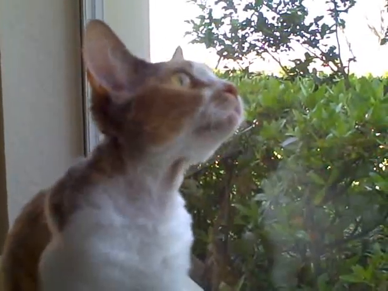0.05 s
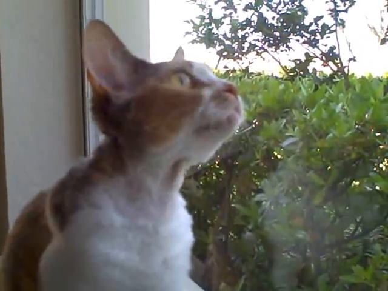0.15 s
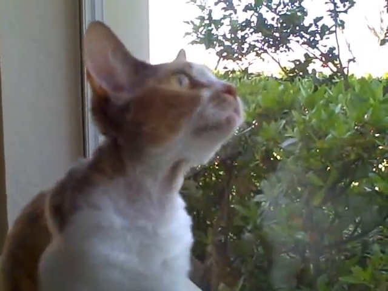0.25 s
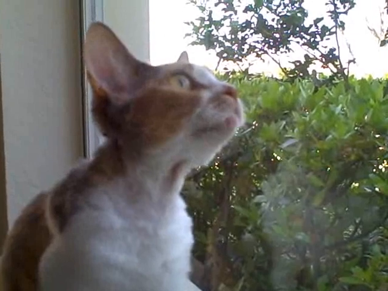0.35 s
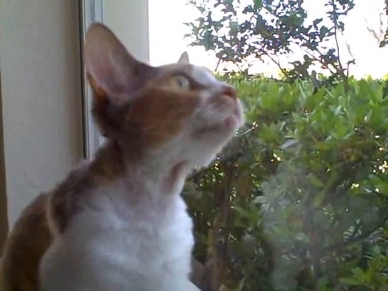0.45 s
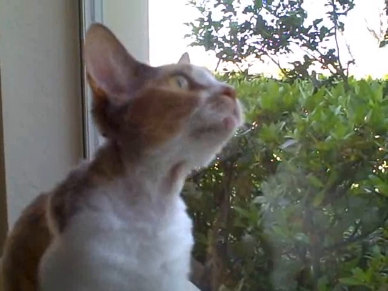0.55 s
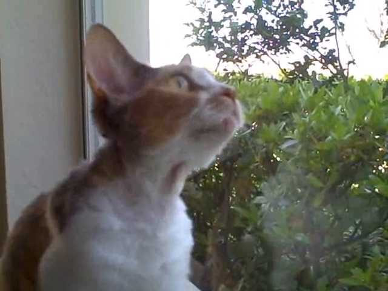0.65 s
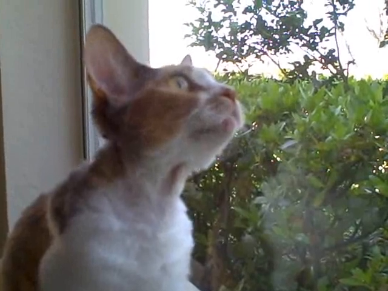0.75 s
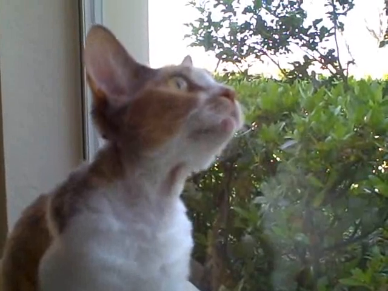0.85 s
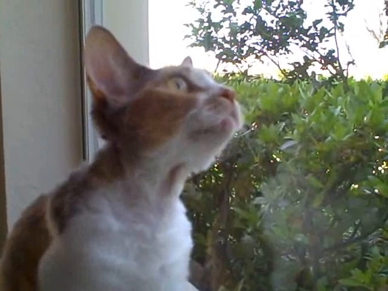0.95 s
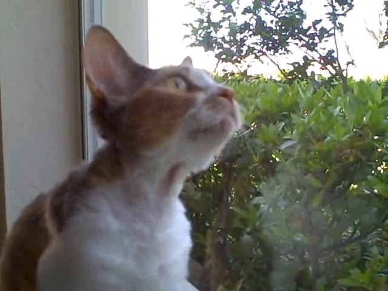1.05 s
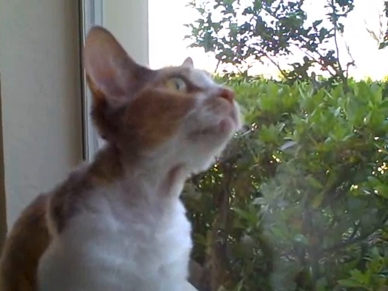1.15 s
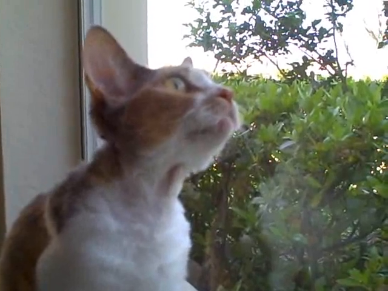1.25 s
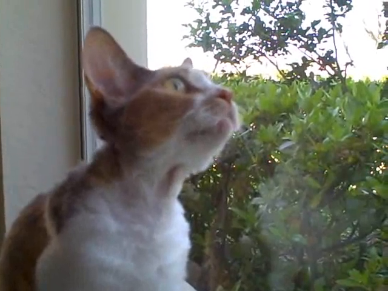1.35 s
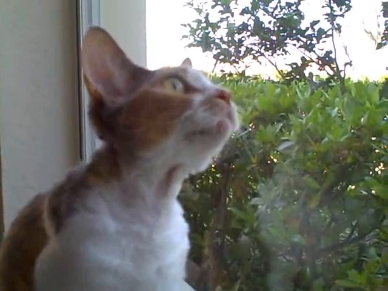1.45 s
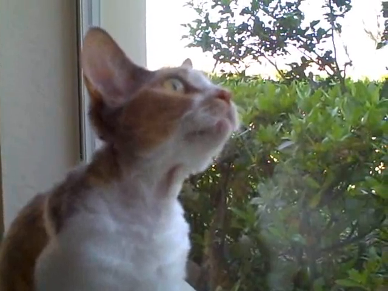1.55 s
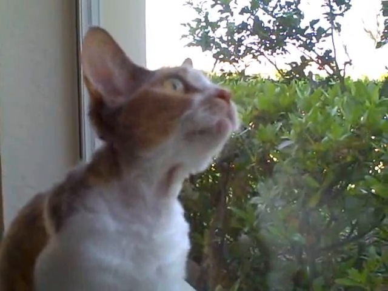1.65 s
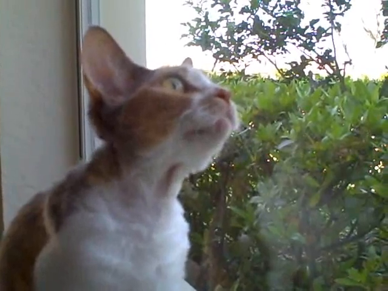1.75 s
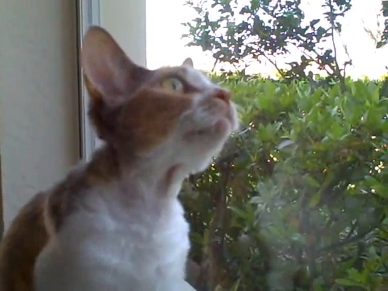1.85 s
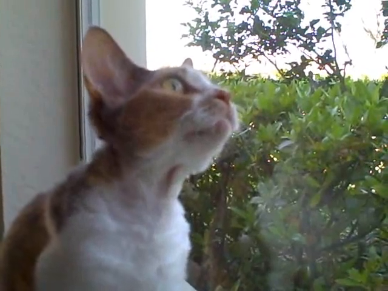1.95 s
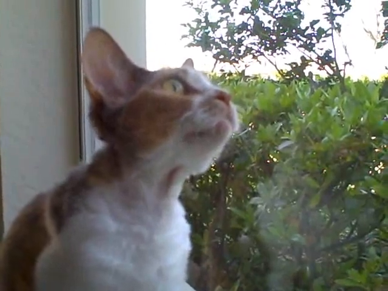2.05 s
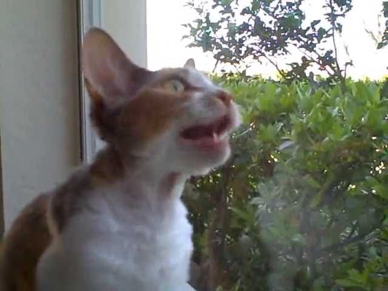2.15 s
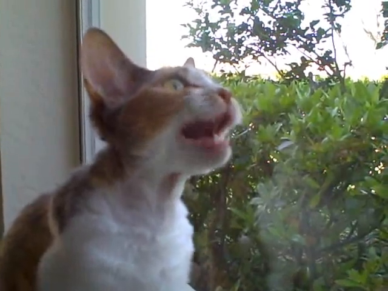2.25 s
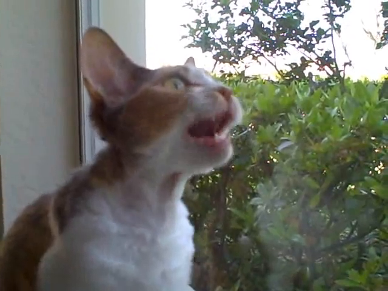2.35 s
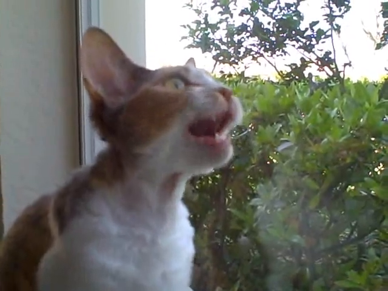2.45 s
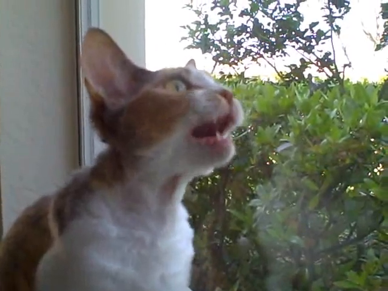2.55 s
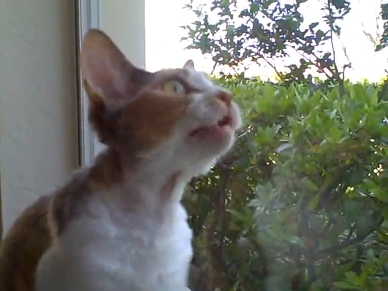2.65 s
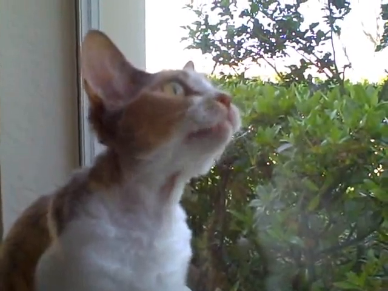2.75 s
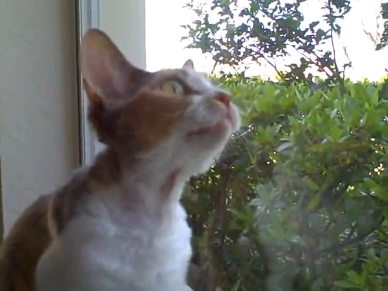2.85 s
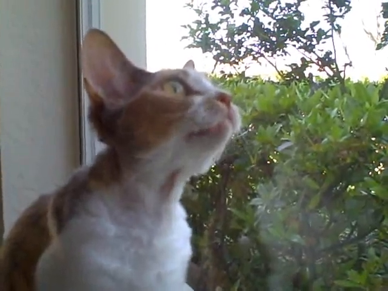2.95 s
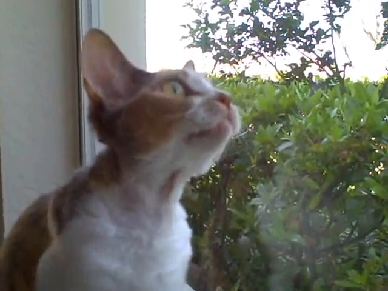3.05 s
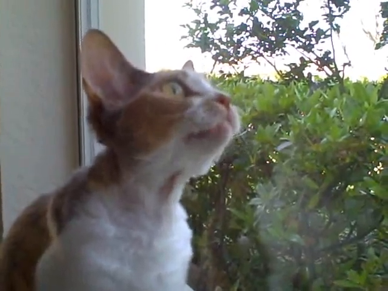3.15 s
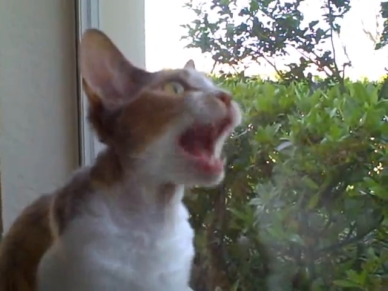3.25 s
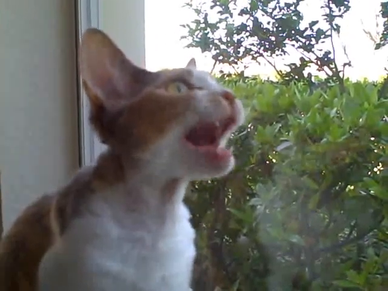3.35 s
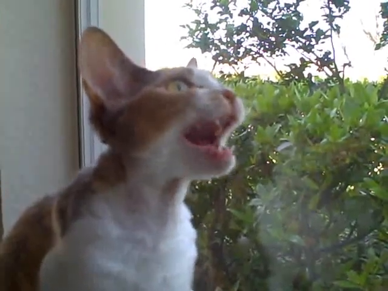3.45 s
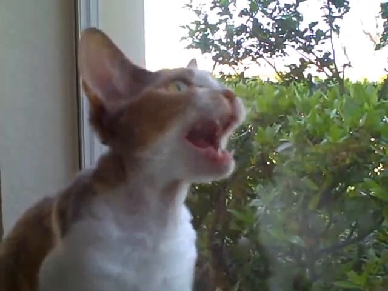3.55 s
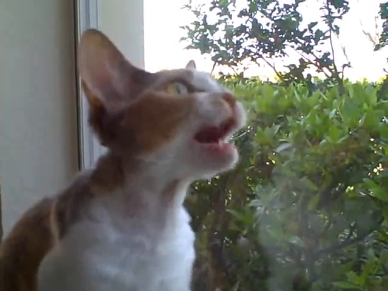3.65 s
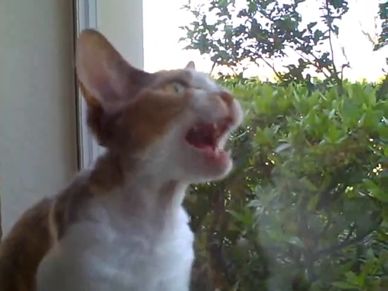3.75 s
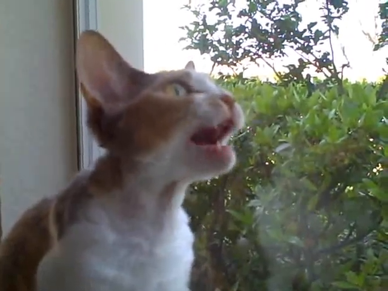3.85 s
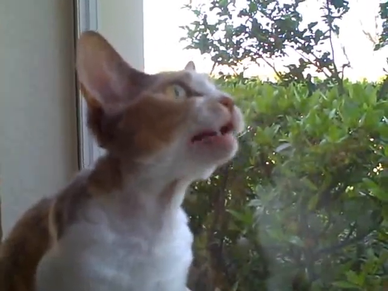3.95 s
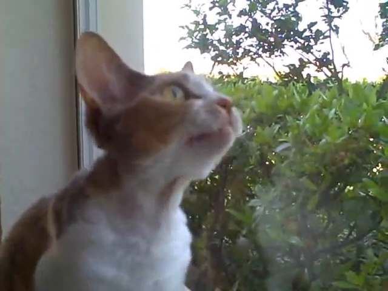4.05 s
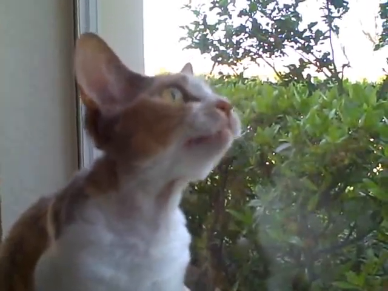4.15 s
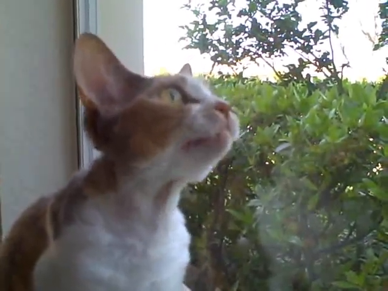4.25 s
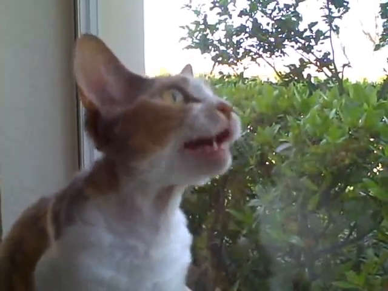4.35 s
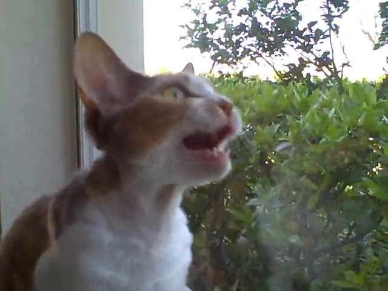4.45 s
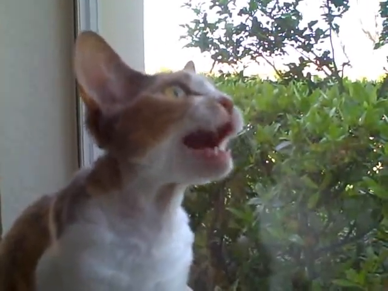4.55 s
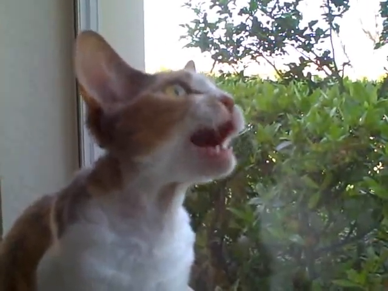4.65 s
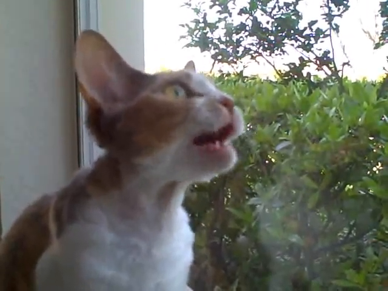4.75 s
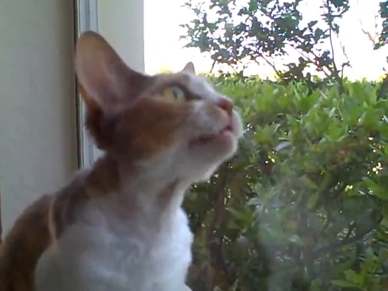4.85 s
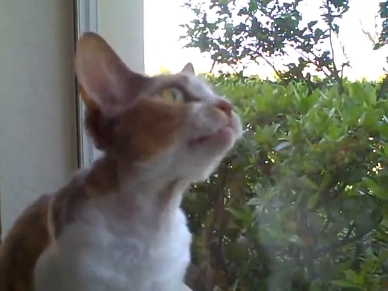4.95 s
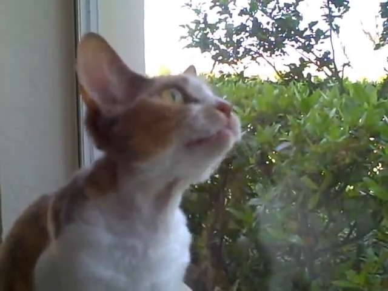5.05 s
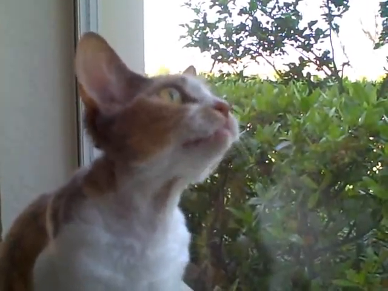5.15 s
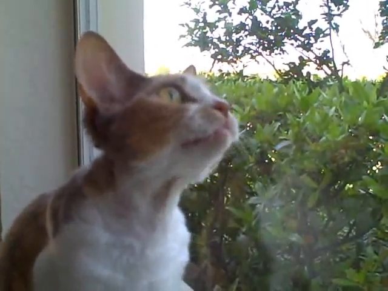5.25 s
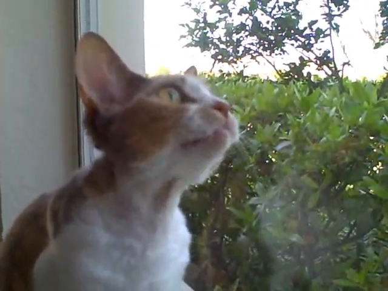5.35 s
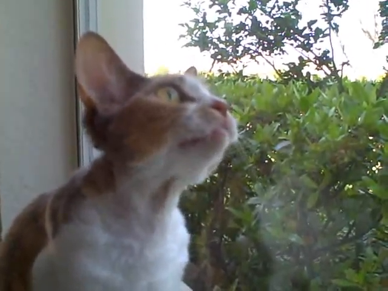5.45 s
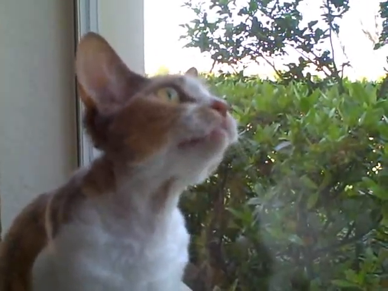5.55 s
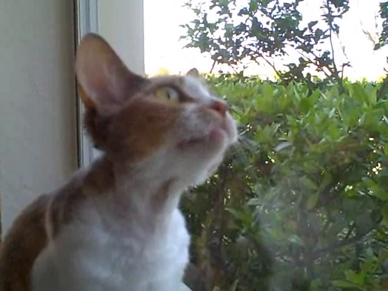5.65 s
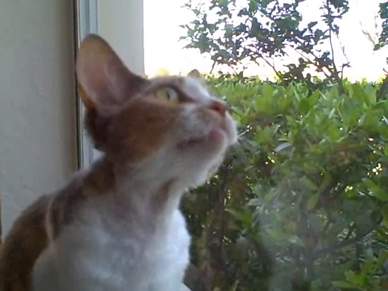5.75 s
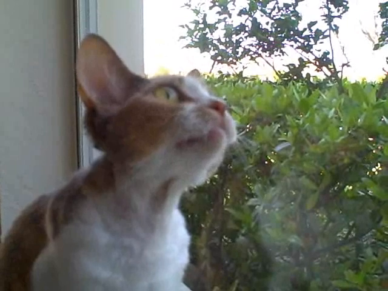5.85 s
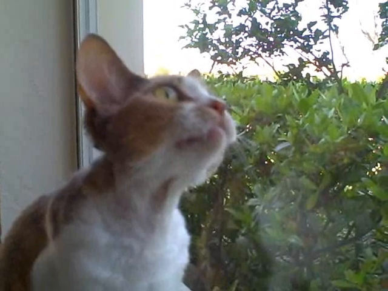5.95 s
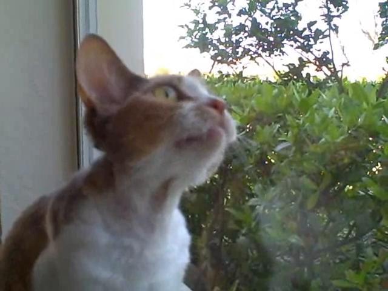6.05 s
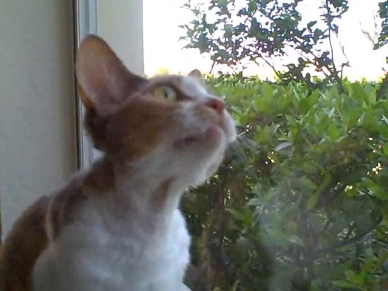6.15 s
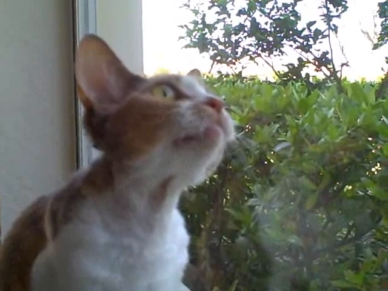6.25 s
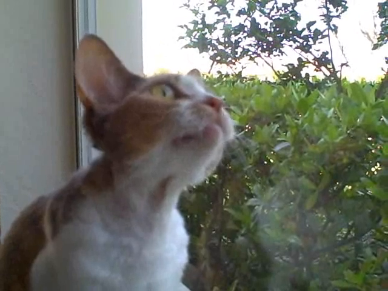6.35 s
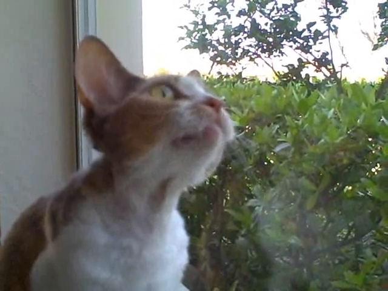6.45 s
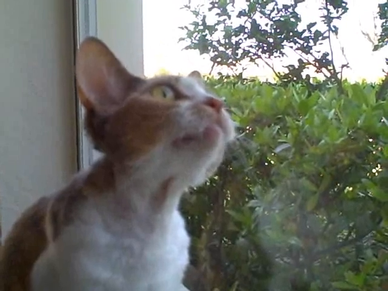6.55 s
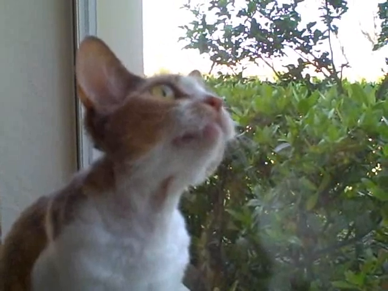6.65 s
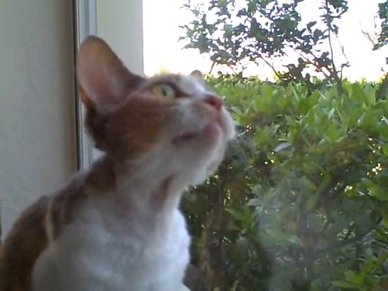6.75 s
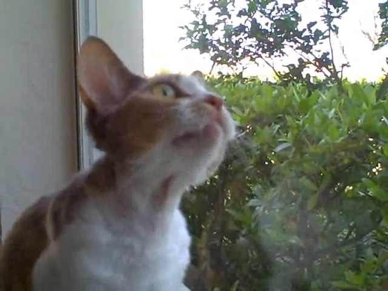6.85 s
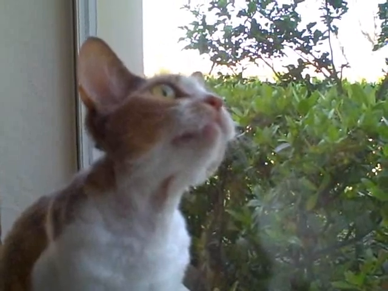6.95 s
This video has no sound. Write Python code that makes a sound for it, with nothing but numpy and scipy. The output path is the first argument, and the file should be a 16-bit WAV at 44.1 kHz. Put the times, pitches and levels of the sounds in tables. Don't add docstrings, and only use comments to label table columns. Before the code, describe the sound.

A quiet room by a window, with soft low rumble, faint wavering mains hum and light hiss throughout. A distant bird chirps faintly near 0.1 s. At 0.9 s a bird outside gives a short hoarse whistle, falling quickly and settling as its breathy rasp swells; a very faint note follows around 1.6 s. From 2.1 to 2.7 s a cat close by chatters: wet, sharp jaw clicks, two especially strong, with a burst of air hissing past its teeth. A denser bout runs from 3.3 to 4.1 s, full of crackling spit and short puffs, then a softer one from 4.3 to 4.9 s, ending with a faint lip tick at 5.1 s. Far chirps, blurred by reflections, continue among the clicks until about 5.7 s. Near 6.2 s the hoarse falling whistle returns, then the room tone remains. The small camera adds gritty, mirrored treble.

```python
import sys
import numpy as np
from scipy import signal
from scipy.fft import rfft, irfft, next_fast_len
from scipy.io import wavfile
from scipy.ndimage import uniform_filter1d

SR = 44100
rng = np.random.default_rng(int(sys.argv[2]) if len(sys.argv) > 2 else 0)


def volts_from_decibels(level):
    exponent = np.asarray(level, float) / 20
    return 10 ** exponent


def file_out(sig):
    cols = np.atleast_2d(sig).T
    lim = np.clip(cols, -1, 1)
    pcm = np.round(lim * 32767).astype(np.int16)
    wavfile.write(sys.argv[1], SR, pcm)


N = 308259
# t/s, peak level/dB, mouth ring f/Hz, low push level/dB
LIP_TICKS = [
    (1.1585, -45, 6500, -12),
    (2.2212, -45, 6100, -10),
    (4.1232, -44, 6500, -12),
    (4.365, -43, 6500, -9),
    (4.7849, -22, 5080, -9),
    (5.1438, -33, 5300, -16),
]


def evened(x):
    return x / np.sqrt(np.mean(x ** 2) + 1e-20)


def add(mix, s, sound):
    part = mix[round(s * SR):][:len(sound)]
    part += sound[:len(part)]


def coloured(points, count):
    f, db = np.transpose(points)
    size = next_fast_len(count)
    hz = np.fft.rfftfreq(size, 1 / SR)
    shape = volts_from_decibels(np.interp(np.log(hz + 1), np.log(f + 1), db, left=-90, right=-90))
    return evened(irfft(rfft(rng.standard_normal(size)) * shape, size)[:count])


def resonate(x, hz, width):
    turn = np.exp(2j * np.pi * np.cumsum(hz * np.ones(len(x))) / SR)
    r = np.exp(-np.pi * width / SR)
    return 2 * (turn * signal.lfilter([(1 - r) ** 2], [1, -2 * r, r * r], x / turn)).real


def house():
    # f/Hz, level/dB per Hz
    floor_curve = [(15, -28), (25, 3), (57, 0), (156, -7.5), (235, -6.5), (532, -18.5), (601, -14),
                   (661, -15), (711, -16), (926, -21), (1650, -25.5), (4650, -28), (5920, -20), (7900, -26),
                   (10300, -55), (17400, -120)]
    # f/Hz, level/dB
    mains = [(59, -56), (120, -65), (239, -64.5), (361, -67.5), (480, -71.5), (600, -65), (720, -68)]
    t = np.arange(N) / SR
    swell = volts_from_decibels(0.067 * evened(uniform_filter1d(rng.standard_normal(N), 9000)))
    out = volts_from_decibels(-50.5) * swell * coloured(floor_curve, N)
    for hz, db in mains:
        steady = np.cos(2 * np.pi * (hz * t + rng.random()))
        waver = evened(resonate(rng.standard_normal(N), hz, 5.7))
        out += volts_from_decibels(db) * (steady + 0.51 * waver)
    return out


def chirp(level_db, beak_hz):
    rate_hz, length_s, rise_s = 435, 0.059, 0.0064
    t = np.arange(round(length_s * SR)) / SR
    noise = rng.standard_normal(len(t))
    overtones = sum(resonate(noise, k * rate_hz, 190) for k in range(5, 10))
    falling_hz = beak_hz * (1.1 - .15 * t / length_s)
    buzz = evened(resonate(overtones, falling_hz, 1150))
    return volts_from_decibels(level_db) * buzz * np.minimum(t / rise_s, 1) * np.cos(np.pi / 2 * t / length_s)


def far_birds():
    # t/s, level/dB, beak resonance f/Hz
    calls = [(.148, -53, 2750), (1.828, -58, 3000), (2.6, -55, 3100), (3.028, -59, 2950),
             (3.575, -58, 2900), (4.103, -56, 2800), (4.548, -51, 2800), (4.743, -53, 2950),
             (4.948, -52, 2800), (5.703, -56, 2700), (5.345, -54, 2900)]
    mix = np.zeros(N)
    for s, level_db, beak_hz in calls:
        add(mix, s, chirp(level_db, beak_hz))
    return mix + volts_from_decibels(-8) * echoes(mix, .4, 1400, 7800)


def effort(start, swell, level_db, throb_hz, first):
    lead_s, release_s = .018, 0.074
    t = np.arange(start - lead_s, start + swell + 0.393, 1 / SR)
    rising = np.minimum((t - start) / swell, 1) - 1
    after = np.maximum(t - start - swell, 0)
    let_go_db = -9.5 * np.minimum(after / release_s, 1) / 2
    throb_db = 3 * np.cos(2 * np.pi * throb_hz * (t - start - first)) * np.exp(-after / release_s)
    lead_db = -11 * np.clip((start + 0.0037 - t) / 0.006, 0, 1)
    tone_db = level_db + lead_db + throb_db + let_go_db - 70 * after
    octave_db = 2 * level_db + 49.5 - 33 * abs(rising) ** 1.87 + let_go_db - 82 * after
    rasp_db = 2 * level_db + 34.5 + 12.5 * rising + let_go_db - 96 * after
    return t, tone_db, octave_db, rasp_db


def whistle(note, start_hz, glide_start, settled_hz, sag_s):
    # f/Hz, level/dB per Hz
    rasp_curve = [(600, -0.5), (1300, -4), (1900, 2), (2300, 0.5), (2700, 2), (4500, -2.5), (5800, -1),
                  (7500, 3)]
    t, tone_db, octave_db, rasp_db = effort(*note)
    tone_noise, octave_noise, gust_noise, pitch_noise = rng.standard_normal((4, len(t)))
    hz = settled_hz + (start_hz - settled_hz) * np.exp(-np.maximum(t - glide_start, 0) / sag_s)
    flicker = 1 + .007 * evened(uniform_filter1d(pitch_noise, 500))
    phase = 2 * np.pi * np.cumsum(hz * flicker) / SR
    tone = .68 * np.sqrt(2) * np.cos(phase) + .73 * evened(resonate(tone_noise, hz, 170))
    octave = .78 * np.sqrt(2) * np.cos(2 * phase) + .6 * evened(resonate(octave_noise, 2 * hz, 190))
    gusts = volts_from_decibels(2.8 * evened(uniform_filter1d(gust_noise, 150)))
    air = coloured(rasp_curve, len(t))
    rasp = air + 1.9 * resonate(air, 2250, 92) + 2.4 * resonate(air, 5850, 120)
    voiced = volts_from_decibels(tone_db) * tone + volts_from_decibels(octave_db) * octave
    sound = voiced + volts_from_decibels(rasp_db + 7.0) * gusts * rasp
    return t[0], sound * signal.windows.tukey(len(t), .05)


def near_bird():
    # start t/s, swell t/s, tone level/dB, throb f/Hz, first throb t/s after the start
    whistled = [
        (.899, .138, -43.5, 23, .004),
        (6.17, .125, -44, 19, .028),
        (1.632, .11, -69.5, 11, .025),
    ]
    # start f/Hz, glide start t/s, settled f/Hz, time constant t/s
    pitch_falls = [
        (3990, .899, 3050, .032),
        (3900, 6.172, 3105, .04),
        (3300, 1.625, 3240, .02),
    ]
    mix = np.zeros(N)
    for note, fall in zip(whistled, pitch_falls):
        add(mix, *whistle(note, *fall))
    return mix + volts_from_decibels(-21) * echoes(mix, .25, 1500, 7800)


def click(peak_db, ring_hz, push_db):
    t = np.arange(700) / SR
    onset = np.minimum(t / .00036, 1)
    ring = np.sin(2 * np.pi * ring_hz * t) * volts_from_decibels(-60 * t / 0.0035)
    cavities = sum(np.sin(2 * np.pi * cavity_hz * t) for cavity_hz in (850, 1600, 2700))
    push = cavities * volts_from_decibels(push_db + 1.0 - 60 * t / 0.0014)
    fizz = evened(resonate(rng.standard_normal(len(t)), ring_hz, 5100)) * volts_from_decibels(-14 - 60 * t / 0.012)
    return volts_from_decibels(peak_db + 5.0) * onset * (ring + push + fizz)


def beats():
    # t/s, snap level/dB, mouth ring f/Hz,
    # low push level/dB, crackle level/dB re snap
    jaw_beats = [(2.1377, -36.5, 6550, -21, -25), (2.2303, -40, 6400, -4, -25),
                 (2.2336, -24, 6750, -9, -21), (2.2825, -30.5, 6800, -10, -22),
                 (2.2937, -32, 6300, -20, -20), (2.4312, -10, 5540, -0.5, -16.5),
                 (2.4915, -34, 4800, -10, -15), (2.5439, -38, 6200, -7, -8), (2.6, -40, 5640, -5, -15),
                 (2.6262, -11, 5990, -3, -18), (2.6464, -32, 5810, -20, -4),
                 (2.6584, -15.5, 6200, -9, -17), (2.6915, -32, 6030, -17, -15),
                 (3.3396, -24.5, 5330, -11, -22), (3.344, -23, 7100, -19, -21),
                   (3.4006, -19.5, 7000, -11, -23), (3.406, -26, 7020, -10, -14),
                   (3.414, -17, 5350, -8, -12.5), (3.432, -24, 5300, -8, -6), (3.4985, -28, 5140, -9, -15),
                   (3.5513, -29, 5200, -4, -1.5), (3.6104, -33.5, 4870, -2, -20),
                   (3.6595, -16.5, 5660, -15, -5), (3.6676, -22, 5340, -22, -10),
                   (3.7114, -26, 5400, -15, -22), (3.7135, -12.5, 5160, -11.5, -6),
                   (3.855, -34, 4960, -8, -20), (3.9028, -33, 5300, -7, -12), (3.919, -14, 6000, -18, -19),
                   (3.9249, -17.5, 5560, -11, -17), (3.97, -20.5, 5040, -8.5, -15),
                   (4.0084, -43, 5680, -7, -15), (4.0986, -39, 7000, -17, -20),
                 (4.275, -32, 5080, -18, -24), (4.4156, -28.5, 6370, -7.5, -18),
                  (4.4318, -33.5, 6540, -8, -18), (4.5667, -18, 4870, -12, -24),
                  (4.614, -26, 5570, -8, -18), (4.663, -31, 5150, -5, -17), (4.6755, -32, 5170, -21, -9),
                  (4.7285, -22, 5030, -24, -20), (4.7301, -27.5, 5000, -7, -15),
                  (4.7953, -29, 5800, -4, -8), (4.838, -34, 5470, -17, 1)]
    return jaw_beats


def crackle():
    gap_s, fall_db, scatter_db, push_db, detune = .0034, -3.5, 2.5, -16, 0.069
    s, snap_db, ring_hz, _, crackle_db = np.transpose(beats())[:, :, None]
    gap, size, tune = rng.uniform(-1, 1, (3, len(s), 4))
    when = s + np.cumsum(gap_s * (1 + .4 * gap), axis=1)
    pop_db = snap_db + crackle_db + fall_db * np.arange(4) + scatter_db * size
    pop_hz = ring_hz * (1 + detune * tune)
    return np.transpose([when.ravel(), pop_db.ravel(), pop_hz.ravel(), np.full(when.size, push_db)])


def puff(level_db, rise, t60, hiss_hz):
    t = np.arange(round(.3 * SR)) / SR
    hiss_noise, sputter_noise = rng.standard_normal((2, len(t)))
    hiss = evened(resonate(hiss_noise, hiss_hz, 1700))
    low = coloured([(300, -17), (1200, 0.5), (2300, 4.5), (4200, -10.0)], len(t))
    sputter = volts_from_decibels(2.5 * evened(uniform_filter1d(sputter_noise, 40)))
    low_db = -11.5 + 6 * np.exp(-rise / 0.0056)
    shape = np.minimum(t / rise, 1) * volts_from_decibels(-60 * np.maximum(t - rise, 0) / t60)
    return volts_from_decibels(level_db) * shape * sputter * (hiss + volts_from_decibels(low_db) * low)


def cat():
    # t/s, level/dB, rise t/s, t60/s, hiss centre f/Hz
    breaths = [(2.434, -47, .002, 0.19, 5800), (2.479, -49.5, 0.0095, 0.089, 5060),
               (2.628, -44, 0.0018, .08, 5800), (2.652, -24.5, .012, 0.097, 6040),
               (2.678, -40, 0.0046, .08, 6000), (3.43, -42.5, 0.0015, 0.075, 5360),
               (3.557, -36.5, 0.0076, 0.043, 5600), (3.658, -30.5, 0.0019, 0.047, 5460),
               (3.71, -30, 0.0069, 0.083, 5840), (3.906, -28.5, 0.019, 0.039, 5840),
               (3.972, -48, 0.0071, 0.15, 5400), (4.019, -47.5, 0.018, 0.18, 5530),
               (4.663, -41.5, 0.0029, 0.07, 5300), (4.787, -35, 0.0069, 0.16, 5800),
               (4.834, -45.5, 0.011, 0.17, 5800), (4.863, -51, 0.018, .06, 5600),
               (4.905, -52.5, 0.033, 0.13, 5100), (4.939, -54.5, 0.019, 0.17, 6550)]
    mix = np.zeros(N)
    snaps = [row[:4] for row in beats() + LIP_TICKS]
    for clicks in (snaps, crackle()):
        for s, peak_db, ring_hz, push_db in clicks:
            add(mix, s, click(peak_db, ring_hz, push_db))
    for s, level_db, rise, t60, hiss_hz in breaths:
        add(mix, s, puff(level_db, rise, t60, hiss_hz))
    return mix + volts_from_decibels(-25.5) * echoes(mix, 0.44, 1700, 5870)


def echoes(x, t60, lo_hz, hi_hz):
    t = np.arange(SR // 2) / SR
    tail = coloured([(lo_hz, -6), (5800, 0), (hi_hz, -6)], len(t)) * volts_from_decibels(-60 * t / t60)
    return signal.fftconvolve(x, tail / np.linalg.norm(tail))[:N]


def scene():
    return (house() + far_birds() + near_bird() + cat())[None]


def sample_and_hold(dry, hz):
    hold_hz = 16000
    smooth = 1 / np.sqrt(1 + (hz / 7300) ** 14)
    lift = 1 / np.sinc(np.minimum(hz / hold_hz, .5))
    band = irfft(rfft(dry) * smooth * lift, N)
    mirrored = band * (1 + 2 * np.cos(2 * np.pi * hold_hz * np.arange(N) / SR))
    return irfft(rfft(mirrored) * np.sinc(hz / hold_hz), N)


def top_band(held, hz, from_hz):
    heard = beats() + LIP_TICKS[3:]
    at = np.round(np.sort([row[0] for row in heard]) * SR).astype(int)
    gate = np.ones(N)
    for first in at[np.diff(at, prepend=0) > 1200]:
        gate[first - 200:first + 130] = .03
    below = irfft(rfft(held) * (hz > 4500) * (hz < 11000), N)
    level = np.sqrt(abs(uniform_filter1d(gate * below ** 2, 200)) + 1e-14)
    hiss = coloured([(12900, -3), (13700, 2), (14600, 0.0), (15400, -2), (15560, -19), (16500, -36)], N)
    own = irfft(rfft(held) * (hz >= from_hz) * (hz < 15480), N)
    return uniform_filter1d(gate, 40) * (own + volts_from_decibels(-16) * level * hiss)


def top_cut(x):
    return signal.sosfilt(signal.butter(12, 16640, fs=SR, output="sos"), x)


def record(dry):
    top_hz = 12800
    hz = np.fft.rfftfreq(N, 1 / SR)
    held = sample_and_hold(dry, hz)
    kept = irfft(rfft(held) * (hz < top_hz), N)
    return top_cut(kept + top_band(held, hz, top_hz))


dry = scene()
out = record(dry)
file_out(out)
```